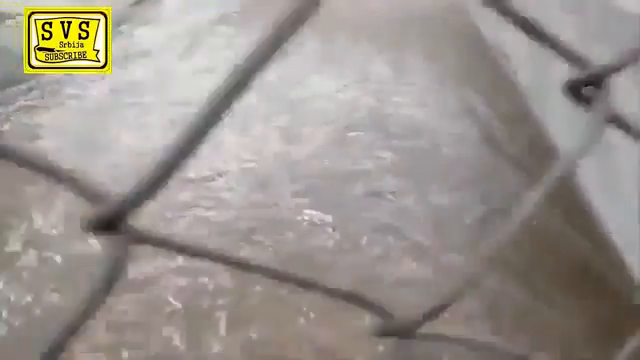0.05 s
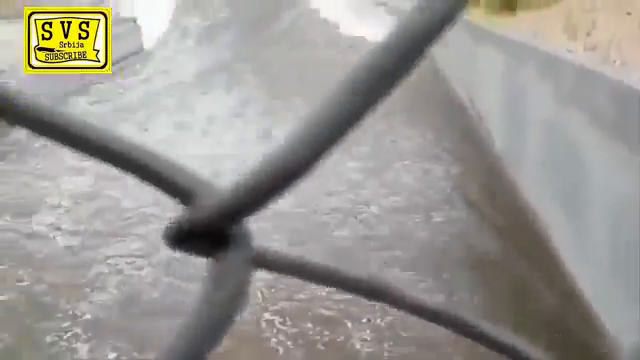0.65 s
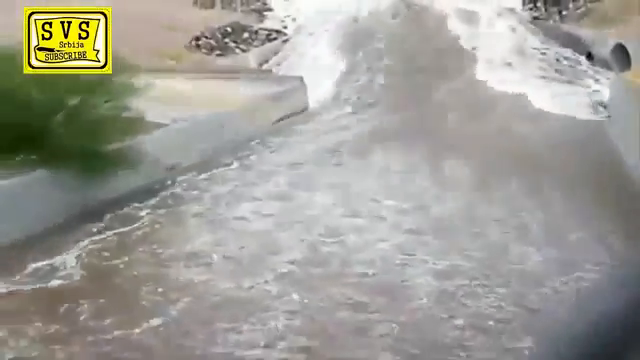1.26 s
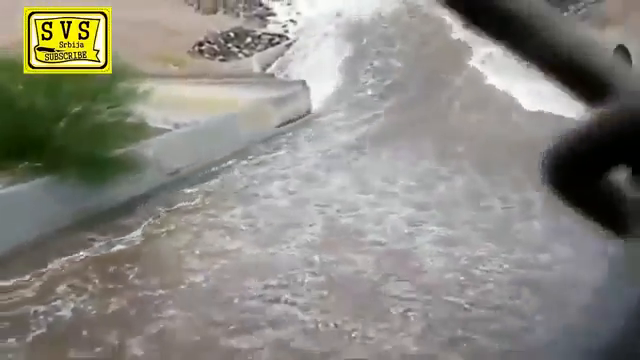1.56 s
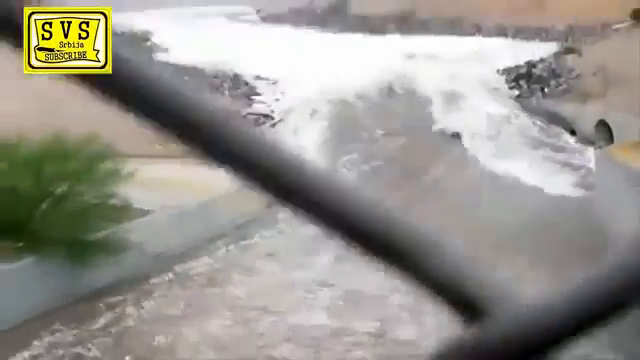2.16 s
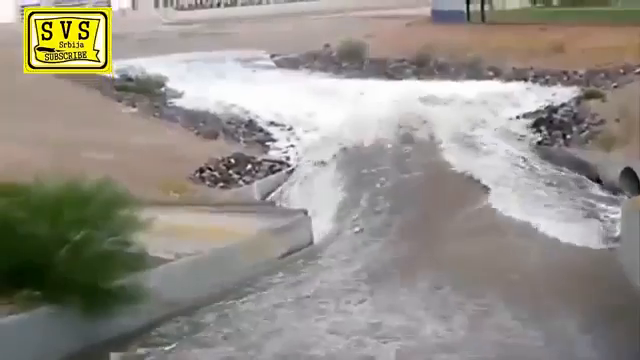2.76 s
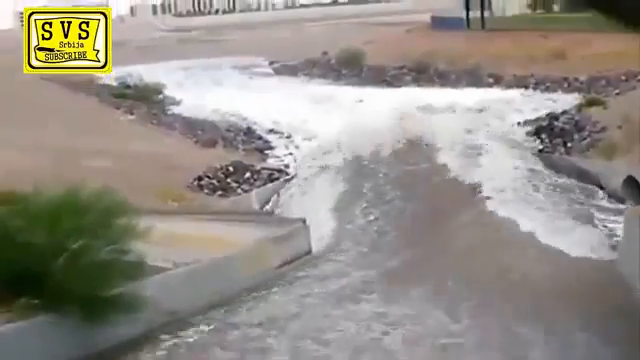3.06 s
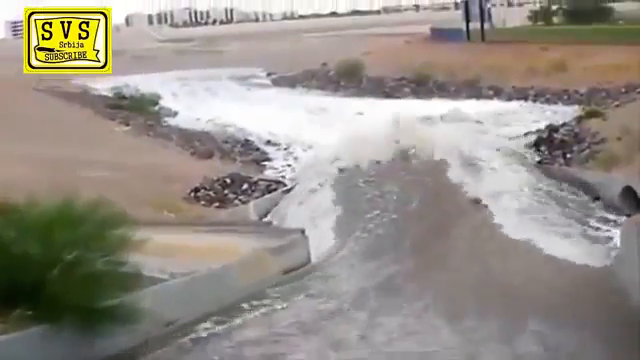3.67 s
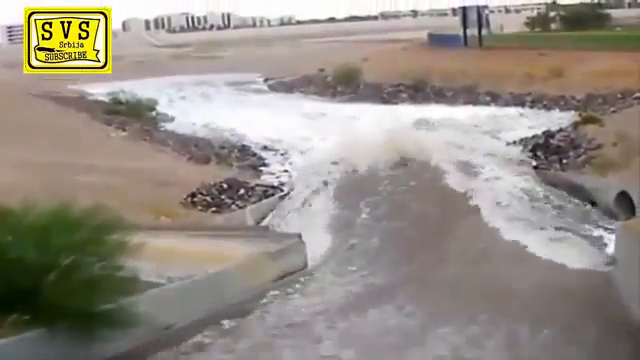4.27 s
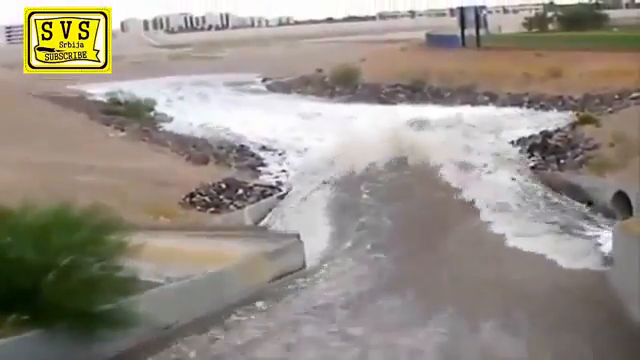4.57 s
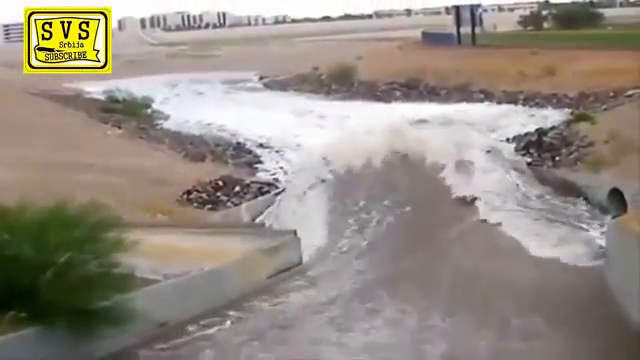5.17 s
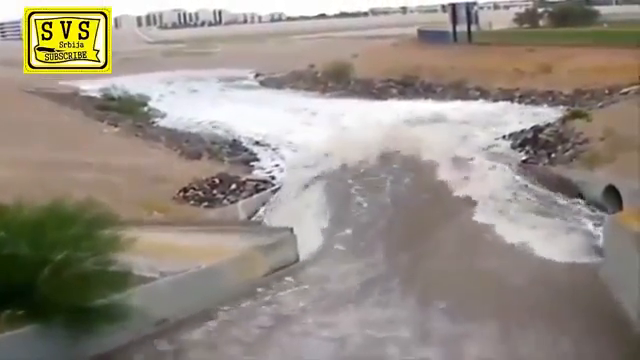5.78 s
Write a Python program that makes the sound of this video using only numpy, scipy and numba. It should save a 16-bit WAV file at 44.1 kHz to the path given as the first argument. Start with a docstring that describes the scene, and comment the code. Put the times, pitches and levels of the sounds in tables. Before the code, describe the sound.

Floodwater rushes steadily down a concrete channel while a wire fence knocks and scrapes against the microphone and wind buffets it.

```python
"""A concrete flood channel, heard through a wire fence. Floodwater rushes by in a steady wash:
countless far splashes merge into a roar, while near bubbles ring and crests break into drops.
A small hand-held camera knocks and scrapes on the wire, which rings its case; hard knocks make
its gain control duck the water. Gusts buffet the two microphone ports, hardest near the end."""
import sys
import numpy as np
from scipy import signal
from scipy.fft import rfft, irfft
from scipy.io import wavfile
from scipy.ndimage import map_coordinates
from numba import njit

SR = 44100
rng = np.random.default_rng(int(sys.argv[2]) if len(sys.argv) > 2 else 0)


def int16_out(signal):
    """Quantize to a 16-bit WAV file."""
    q = np.round(np.clip(np.atleast_2d(signal).T, -1, 1) * 32767)
    wavfile.write(sys.argv[1], SR, q.astype(np.int16))


N = 261072
TIME = np.arange(N) / SR
FREQ = np.maximum(np.arange(N // 2 + 1) * SR / N, 1)


def undb(db):
    """Decibels to gain."""
    return 10 ** (np.asarray(db) / 20)


def unit(x):
    """Scale to rms 1."""
    return x / np.sqrt(np.mean(x ** 2))


def curve(rows):
    """Join each column of (s, ..) rows by straight lines."""
    seconds, *columns = np.transpose(rows)
    return [np.interp(TIME, seconds, column) for column in columns]


def across(rows):
    """Spread each column of (Hz, ..) rows over a log-frequency axis."""
    hz, *columns = np.transpose(rows)
    return [np.interp(np.log(FREQ), np.log(hz), column) for column in columns]


def swell(peak, length):
    """A smooth rise and fall around a moment."""
    return np.exp(-(2 * (TIME - peak) / length) ** 2)


def hump(hz, width):
    """A bell curve around a frequency."""
    return np.exp(-((FREQ - hz) / width) ** 2)


def wander(rate):
    """Smooth random drift of spread 1, mostly slower than `rate` Hz."""
    return unit(irfft(rfft(rng.standard_normal(N)) * np.exp(-(FREQ / rate) ** 2), N))


def clicks(rate, spread_db):
    """Random impulses, `rate` a second, most of them small and a few large."""
    hit = rng.random(N) < rate / SR
    size = undb(spread_db * np.minimum(rng.exponential(size=N), 4))
    return hit * size * rng.choice([-1, 1], N)


def ring(hz, t60):
    """One mode, dying by 60 dB in t60 seconds."""
    t = TIME[:SR // 8]
    return np.sin(2 * np.pi * hz * t) * np.exp(-np.log(1000) * t / t60)


def strike(force, response):
    """Drive a ringing body with a force."""
    return signal.fftconvolve(force, response)[:N]


def filtered(x, kind, hz, order=2):
    """A plain low-pass or high-pass."""
    return signal.sosfilt(signal.butter(order, hz, kind, fs=SR, output="sos"), x)


@njit
def bandpass(x, hz, width):
    """State-variable band-pass with a moving centre, gain 1 there."""
    out, band_state, low_state = np.empty(len(x)), 0., 0.
    for i in range(len(x)):
        g, damping = np.tan(np.pi * hz[i] / SR), width / hz[i]
        band = (band_state + g * (x[i] - low_state)) / (1 + g * (g + damping))
        band_state = 2 * band - band_state
        low_state += 2 * g * band
        out[i] = damping * band
    return out


# Gusts that stand out of the breeze. Each row: peak time in seconds, level in dB, length in seconds.
GUSTS = [(0.298, -40, 0.034), (.55, -38, 0.11), (1.315, -26.5, .05), (1.412, -26, 0.12), (1.71, -32, 0.13),
         (2.048, -31, 0.11), (2.195, -34, 0.026), (2.82, -30, 0.22), (3.023, -28, 0.066),
         (3.183, -23, 0.15), (3.363, -32, 0.091), (3.53, -31, .11), (3.969, -18, 0.093), (4.13, -34, 0.12),
         (4.33, -27, 0.1), (4.47, -36, 0.17), (4.583, -30, 0.043), (4.72, -33, 0.075), (4.898, -31, 0.025),
         (5.278, -32, .06), (5.434, -28, 0.093), (5.558, -22, 0.056), (5.648, -13.5, 0.094),
         (5.714, -15, .03), (5.813, -17, 0.16), (5.909, -12, 0.025)]
def gusting(breeze_db=-48, swing_db=5):
    """Strength of the wind: a wandering breeze, and gusts that swell and die away."""
    breeze = undb(breeze_db + swing_db * wander(rate=4.1))
    return breeze + sum(undb(db) * swell(peak, length) for peak, db, length in GUSTS)


# The tone of the buffeting. Each row: frequency in Hz, relative level in dB.
BUFFET_TONE = [(18, -52), (30, -18), (108, -2), (236, -1.5), (345, -14), (673, -23), (1030, -27),
               (1230, -63), (1500, -40), (1950, -66), (3300, -120)]
def wind(left_db=2.0, right_db=-3.5, own_db=-9.5, flutter_db=1.5, overload=.45):
    """Eddies push the two ports in opposite senses; smaller ones hit each port alone."""
    tone_db, = across(BUFFET_TONE)
    eddy, *own_eddies = unit(irfft(rfft(rng.standard_normal((3, N))) * undb(tone_db), N))
    ports = np.outer([undb(left_db), -undb(right_db)], eddy) + undb(own_db) * np.array(own_eddies)
    push = ports * gusting() * undb(flutter_db * wander(rate=32))
    return overload * np.tanh(push / overload)  # the strongest eddies overload the capsules softly


# Modes of the camera case. Each row: pitch in Hz, relative level in dB, 60 dB decay time in seconds.
CASE_MODES = [(270, 8.5, 0.026), (787, 7, 0.037), (887, 4, 0.037), (993, 6, 0.033), (1079, 8, 0.067),
              (1554, 6.5, 0.024), (1662, 3.5, 0.058), (1760, 2, .02), (2240, -4, .015), (2700, -9, 0.016)]
def case_ring(favoured_hz=None, falloff_db_per_octave=9):
    """The case rings; a knock stirs most the modes near the pitch its point of contact favours."""
    sound = 0
    for k, (hz, db, t60) in enumerate(CASE_MODES):
        octaves_away = abs(np.log2(hz / favoured_hz)) if favoured_hz else 0
        sound += (-1) ** k * undb(db - falloff_db_per_octave * octaves_away) * ring(hz, t60)
    return sound / abs(sound).max()


# Knocks on the fence. Each row: start in seconds, ring level in dB, favoured pitch in Hz.
KNOCKS = [(1.008, -9, 890), (1.13, -11, 1000), (1.189, -12, 1500), (1.440, -11, 1150), (1.478, -2, 1600),
          (1.712, -7, 480), (2.425, -7, 650), (2.483, -16, 1000), (2.533, -4.5, 1080), (2.546, -6, 1550),
          (2.553, -3, 1600), (5.799, -12, 750)]
def knocks(crack_db=-10, crack_edge_hz=2600, crack_decay_s=.0018):
    """Each knock is the dull crack of the contact, then the ring of the case."""
    out = np.zeros(N)
    for start, db, favoured_hz in KNOCKS:
        clink = case_ring(favoured_hz)
        noise = unit(filtered(rng.standard_normal(len(clink)), "lowpass", crack_edge_hz))
        crack = undb(crack_db) * noise * np.exp(-TIME[:len(clink)] / crack_decay_s)
        at = int(start * SR)
        out[at:at + len(clink)] += undb(db) * (clink + crack)[:N - at]
    return out


# The case slides along the wire. Each row: start in seconds, length in seconds, level in dB.
SLIDES = [(1.022, 0.13, -17), (1.19, .06, -29), (1.258, .03, -19), (1.441, 0.016, -19.5),
          (1.468, 0.046, -13), (1.73, 0.043, -24), (2.427, 0.068, -16), (2.503, 0.032, -16),
          (2.53, 0.014, -12)]
def scrapes(bite_s=.0059, release_s=.013, ease_db_per_s=37):
    """Stick-slip rings the case; the pressure bites quickly, eases steadily and lets go."""
    # slips are too brief to stir the lowest mode
    slips = filtered(clicks(rate=1400, spread_db=1.5), "highpass", hz=650)
    pressure = 0
    for start, length, db in SLIDES:
        age = TIME - start
        contact = np.clip(age / bite_s, 0, 1) * np.clip(1 - (age - length) / release_s, 0, 1)
        pressure += contact * undb(db - ease_db_per_s * np.clip(age, 0, length))
    return pressure * unit(strike(slips, case_ring()))


# The wire sways under the camera. Each row: peak time in seconds, level in dB, rise time in seconds.
SWAYS = [(1.043, 16, 0.02), (1.494, -1, 0.028), (1.73, -6.5, 0.015), (2.451, 6, 0.023), (2.52, -2.5, 0.033)]
def sways():
    """The springy wire gives way and returns: each time one large push, too slow to hear."""
    return sum(undb(db) * swell(peak, 2 * rise) for peak, db, rise in SWAYS)


def fence(left_db=-2.5, right_db=1):
    """The wire shakes the case, which shakes the two capsules in opposite senses."""
    shake = knocks() + scrapes() + sways()
    late_shake = np.roll(shake, 3)  # it reaches the left capsule a moment later
    return np.array([undb(left_db) * late_shake, -undb(right_db) * shake])


# Near bubbles, from deep gurgles to small plinks. Each row: bubbles per second, lowest pitch in Hz,
# range in octaves, ring length in cycles, level against the wash in dB.
BUBBLE_SIZES = [(20, 228, .35, 50, -26), (40, 780, .3, 70, -25), (120, 1400, 1.7, 130, -18.5)]
def near_bubbles(pitch_rise=.06):
    """Bubbles pinch off one by one, ring briefly and rise in pitch."""
    out, t = 0, TIME[:SR // 5]
    for rate, low_hz, octaves, cycles, db in BUBBLE_SIZES:
        layer = np.zeros(N + SR)
        for when, pitch, strength in rng.random((int(rate * N / SR), 3)):
            hz = low_hz * 2 ** (octaves * pitch)
            age = t * hz / cycles  # reaches 1 when the ring is 60 dB down
            chirp = np.sin(2 * np.pi * hz * t * (1 + pitch_rise * age / 2))
            at = int(when * N)
            layer[at:at + len(t)] += strength ** 2 * chirp * np.exp(-np.log(1000) * age)
        out += undb(db) * unit(layer[:N])
    return out


# Near splashes. Each row: peak time in seconds, centre in Hz, drop level in dB, length in seconds.
SPLASHES = [(1.86, 2600, -11, 0.14), (2.77, 1900, -3, 0.057), (3.558, 3600, -3, 0.094),
            (3.76, 1900, -21, .06), (4.683, 3300, 2, 0.077), (5.335, 4100, 3, 0.054),
            (5.557, 3600, 1, 0.14)]
def splashes():
    """Crests break into a shower of drops, each splash in its own band."""
    drops = unit(clicks(rate=2500, spread_db=2.5))
    return sum(undb(db) * swell(peak, length) * bandpass(drops, np.full(N, float(hz)), hz / 2)
               for peak, hz, db, length in SPLASHES)


# Level of the low roar: the water heaves, and a dip drawn in near 5.7 s plays the gain control
# ducking it under the hardest gust. Each row: time in seconds, gain in dB.
ROAR_RIDE = [(0, 2.5), (.1, -0.5), (.29, 7.5), (.4, 2.5), (.56, -6), (.67, 4), (.8, 0), (.93, 2.5),
             (1.22, 0.5), (1.4, 4.5), (1.65, 2.5), (1.9, 3), (2.4, 1.5), (2.65, 4), (2.95, 2.5), (3.3, 2.5),
             (3.45, 2), (3.75, 0), (3.92, 3.5), (4.12, -0.5), (4.45, 2.5), (5.03, 1), (5.45, 2.5),
             (5.7, -3), (5.92, 2)]
# Level of the mid slosh and the spray, with the same duck near 5.7 s.
# Each row: time in seconds, slosh gain in dB, spray gain in dB.
SLOSH_SPRAY_RIDE = [(0, 1.2, 1.5), (.33, 4, 0.6), (.55, 1.5, 0.5), (.77, 4, 0.7), (.95, 0.5, 0.3),
                    (1.4, 2.5, 1), (2.2, 2, -0.5), (2.85, 2.4, -0.5), (3.4, 1.5, 0), (4.0, 1.5, -0.5),
                    (4.45, 1.5, 0.4), (4.68, 2.5, 1.4), (4.85, 1.5, 0.5), (5.35, 1.5, 1), (5.55, 1.5, 0.5),
                    (5.72, -4.5, -3), (5.92, 1.5, -1.5)]
def churn(surge_db, crackle_db=-9, bubble_db=-8, bubble_cycles=18, flicker_db=.55):
    """Spectrum of white water: far splashes merge, nearer ones crackle and leave ringing bubbles."""
    far = rfft(rng.standard_normal(N))
    near = rfft(unit(clicks(rate=1100, spread_db=3.0)))
    roar_db, = curve(ROAR_RIDE)
    slosh_db, spray_db = curve(SLOSH_SPRAY_RIDE)
    out = 0
    for hz in 62.5 * 2 ** np.arange(9):
        octave_band = np.clip(1 - abs(np.log2(np.clip(FREQ, 62.5, 16000) / hz)), 0, 1)
        water = irfft(octave_band * (far + undb(crackle_db) * near), N)
        if 400 < hz < 5000:
            # small bubbles ring higher and die sooner
            pitches = hz * 2 ** np.linspace(-.5, .5, num=6, endpoint=False)
            bubbles = sum(strike(clicks(rate=35, spread_db=2.5), ring(pitch, bubble_cycles / pitch))
                          for pitch in pitches)
            water += undb(bubble_db) * np.std(water) * unit(bubbles)
        ride_db = roar_db if hz < 400 else slosh_db if hz < 1500 else spray_db
        flicker = (1 + hz / 16000) * wander(rate=16)  # the finest spray comes and goes most
        out += water * undb(surge_db + flicker_db * flicker + ride_db)
    return rfft(out)


# The tone of the wash. Each row: frequency in Hz, relative level in dB.
WASH_TONE = [(36, -26.5), (70, -18.5), (130, -3), (190, -4), (245, 0.5), (303, -3.5), (352, -15),
             (640, -13.5), (850, -7), (1400, -12.5), (3000, -10), (5200, -15.5), (7000, -24),
             (10800, -18.5), (13300, -20)]
# Narrow resonances and hollows of the ports. Each row: centre in Hz, width in Hz, gain in dB.
PORT_EQ = [(240, 18, 0), (444, 61, 2.5), (560, 120, 1), (863, 120, 0), (1034, 42, -1.5), (1920, 130, 1),
           (2260, 220, 0.8), (3270, 100, 0.8), (3650, 200, -1), (3960, 110, 0.5), (4170, 110, 0.5),
           (4520, 100, 0.5)]
# The stereo image of the wash. Each row: frequency in Hz, left minus right in dB,
# likeness of the two sides from 0 to 1, phase lead of the left in radians.
WASH_IMAGE = [(100, -0.5, 0.83, -0.22), (302, -1, 1, 0.39), (470, -1.5, 0.81, -0.33), (563, 1.5, 0, 0.37),
              (824, 3.5, 0.86, -0.13), (1220, 5.5, 0.4, -0.29), (1610, 5.5, 0, -0.95),
              (1930, 2.5, 0.72, -1.26), (3000, 1, 0.25, -0.34), (5000, 0.1, 1, -0.58),
              (10900, -1.5, 0.4, 0.75)]
def wash(surge_depth_db=.52):
    """The water swells as a whole; part reaches both ports alike, the rest comes from all around."""
    surge_db = surge_depth_db * wander(rate=11)
    tone_db, = across(WASH_TONE)
    tone_db += sum(db * hump(hz, width) for hz, width, db in PORT_EQ)
    balance_db, likeness, phase = across(WASH_IMAGE)
    likeness = np.clip(likeness, 0, .98)
    shared = np.sqrt(1 + likeness) * churn(surge_db)
    diffuse = np.sqrt(1 - likeness) * churn(surge_db)
    shared += np.std(irfft(shared, N)) * rfft(near_bubbles() + splashes())
    left = irfft((shared + diffuse) * undb(tone_db + balance_db / 2), N)
    right = irfft((shared - diffuse) * undb(tone_db - balance_db / 2) * np.exp(-1j * phase), N)
    return left, right


# A sweeping boost or cut at the right port. Each row: time in seconds, centre in Hz, gain in dB.
GRIP_SWEEP = [(0, 2870, -7), (.5, 2720, 3), (1.05, 2480, 5), (1.3, 2650, -4), (1.55, 3350, -1),
              (2.8, 3300, 3.5), (3.8, 3050, 2.5), (4.5, 3000, 2.5), (5.92, 3150, -1)]
def shifting_grip(right, width_hz=170.):
    """A resonance at the right port moves as the camera shifts in the hand."""
    hz, db = curve(GRIP_SWEEP)
    return right + (undb(db) - 1) * bandpass(right, hz, width_hz)


# The camera turns a little. Each row: time in seconds, left lag in milliseconds, sheen gain in dB.
CAMERA_TURN = [(0, 0.018, 0), (.9, 0.014, 2.5), (1.7, 0.0011, 3), (2.5, 0, 4), (4.0, 0, 3.5),
               (4.5, 0.039, 4), (5.92, 0.028, 4)]
def turning(left, right, sheen_hz=5700, sheen_width_hz=1500):
    """As the camera turns, the wash reaches the left port later and changes in sheen."""
    lag_ms, sheen_db = curve(CAMERA_TURN)
    late_left = map_coordinates(left, [(TIME - lag_ms / 1000) * SR], order=5, mode="mirror")
    ports = np.array([late_left, right])
    sheen = irfft(rfft(ports) * hump(sheen_hz, sheen_width_hz), N)
    return ports + (undb(sheen_db) - 1) * sheen


def walls(ports, delays_ms=(9.7, 14.3, 21.1, 29.5), drift_ms=.3, echo_db=-19):
    """Drifting echoes off the walls lay shifting ripples on the treble of the wash."""
    treble = filtered(ports, "highpass", hz=1400)
    echoes = 0
    for ms in delays_ms:
        lag = np.rint((ms + drift_ms * wander(rate=2)) * SR / 1000).astype(int)
        echoes += treble[:, np.arange(N) - lag]
    return ports + undb(echo_db) * echoes


def flood(level_db=-22.3):
    """Floodwater between concrete walls, heard from a camera that moves in the hand."""
    left, right = wash()
    ports = turning(left, shifting_grip(right))
    return undb(level_db) * unit(walls(ports))


def scene():
    """Water, wind and the fence against the camera."""
    return flood() + wind() + fence()


def record(dry, threshold_db=-6, attack_s=.002, release_db_per_s=135, clip_level=.57):
    """Gain control ducks loud peaks; the camera cuts deep bass, a narrow treble band and the top."""
    over_db = np.maximum(20 * np.log10(abs(dry).max(axis=0) + 1e-9) - threshold_db, 0)
    recovery_db = release_db_per_s * TIME
    held_db = np.maximum.accumulate(over_db + recovery_db) - recovery_db
    # the gain needs a moment to fall, so the first cycles of a hard knock get through and clip
    attack = 1 / (attack_s * SR)
    duck_db = signal.lfilter([attack], [1, attack - 1], held_db)
    ducked = filtered(dry, "highpass", hz=39, order=5) * undb(-duck_db)
    clipped = np.clip(ducked, -clip_level, clip_level)
    notch = (1 - hump(hz=7880, width=400)) ** 2
    top_cut = signal.ellip(10, .2, 80, 13500, fs=SR, output="sos")
    return signal.sosfilt(top_cut, irfft(rfft(clipped) * notch, N))


dry = scene()
out = record(dry)
int16_out(out)
```